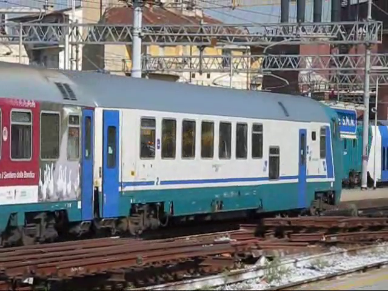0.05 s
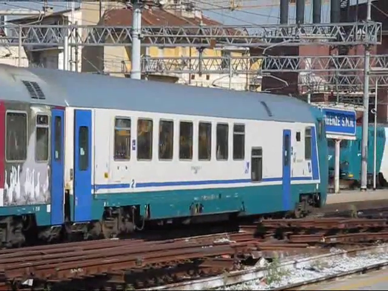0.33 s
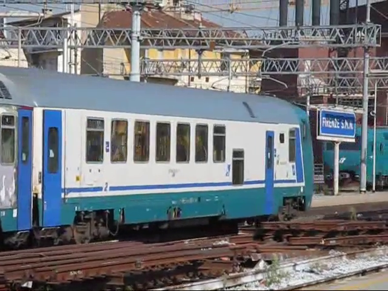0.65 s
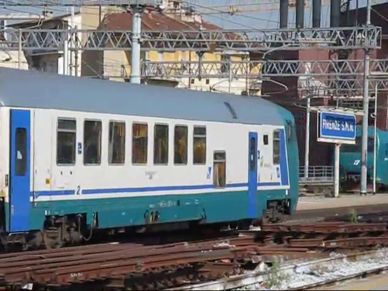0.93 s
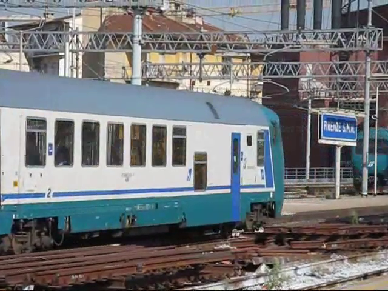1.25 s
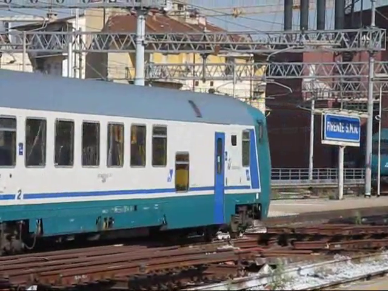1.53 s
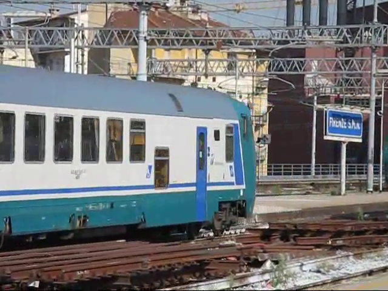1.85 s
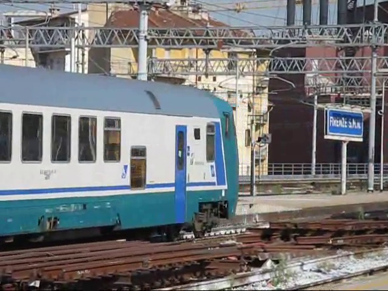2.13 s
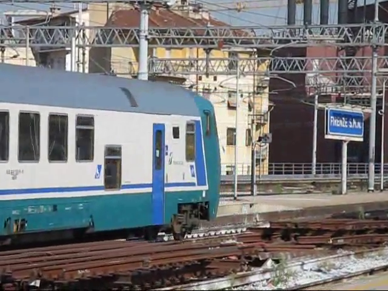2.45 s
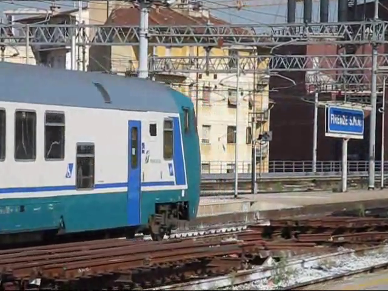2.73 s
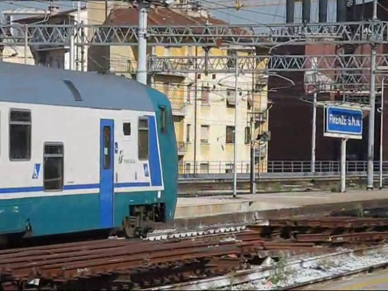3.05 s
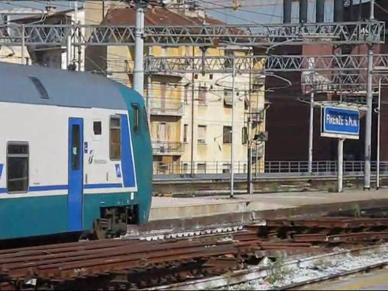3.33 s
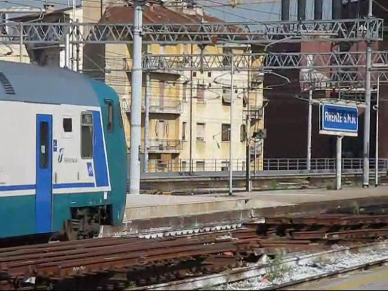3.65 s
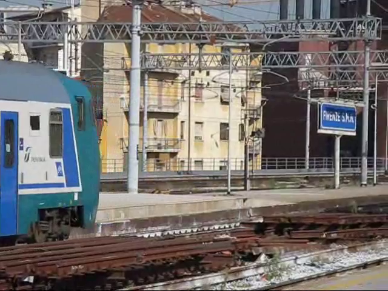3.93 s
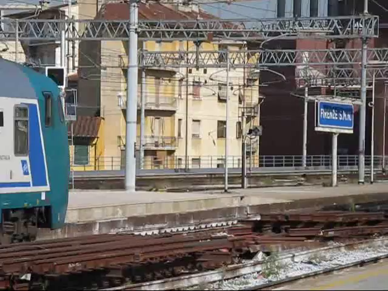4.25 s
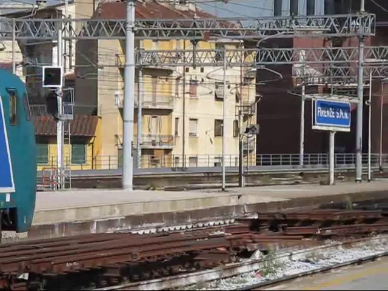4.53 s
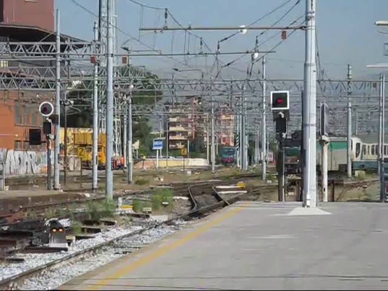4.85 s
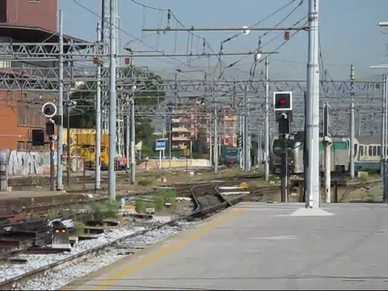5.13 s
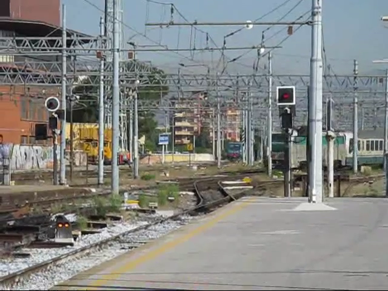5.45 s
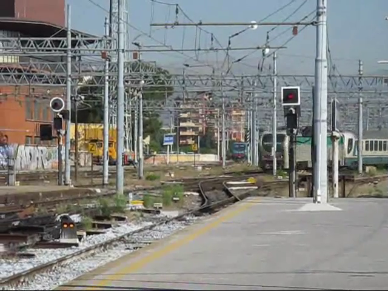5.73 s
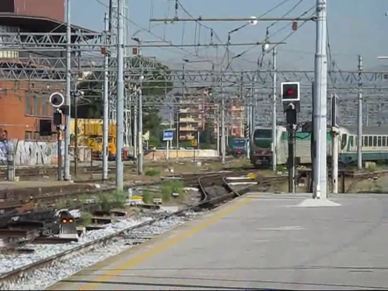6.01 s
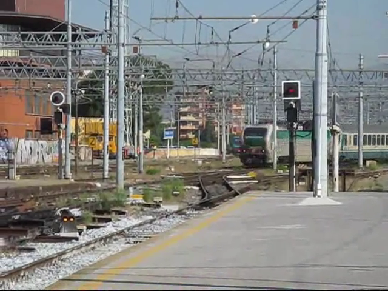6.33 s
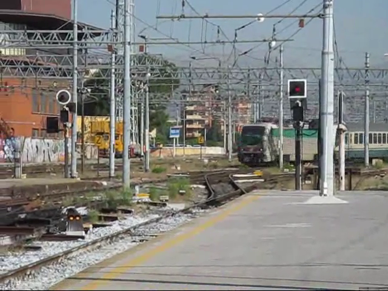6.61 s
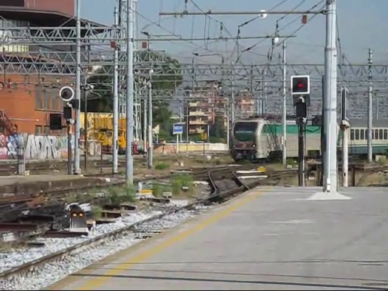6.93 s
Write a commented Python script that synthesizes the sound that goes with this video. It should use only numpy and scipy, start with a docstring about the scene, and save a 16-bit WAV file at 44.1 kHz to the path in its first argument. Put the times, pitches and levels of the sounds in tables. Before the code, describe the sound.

At the start a train wheel gives a few quick, high shrieks that echo through the station and fade within about a second. Passenger coaches roll slowly over points, steel wheels roaring and booming under a steady blower drone with a faint motor whine. Flanges scrape in short patches and running gear knocks irregularly, most clearly around 0.3 and 2.2 seconds. The booming swells near 4 seconds, then everything cuts off at 4.7.

After an instant of silence, at 4.8 seconds, compressed air hisses with a faint whistle over the broad roar of the rail yard. An approaching train rumbles low, with one distant wheel clunk at 6 seconds. A locomotive's wavering electric hum swells at about 6.3 and 7 seconds. Near 6.9 the air valve shuts, leaving a softer leak, and the rumble grows until the end, just after 7. The treble is gritty throughout.

```python
"""A wheel squeal dies away as passenger coaches roll slowly over station points: steel wheels roar
and boom, flanges scrape, running gear knocks, a blower drones. After a moment of silence, a second
scene down the platform: compressed air hisses until its valve shuts, a locomotive hums and an
approaching train rumbles through the yard's roar. A low sampling rate makes the treble gritty."""
import sys
import numpy as np
from scipy import signal
from scipy.fft import rfft, irfft, next_fast_len
from scipy.io import wavfile

SR = 44100
rng = np.random.default_rng(int(sys.argv[2]) if len(sys.argv) > 2 else 0)


def digitize_waveform(pressure):
    """Quantize a signal to 16-bit integers and store it at the path in sys.argv[1].

    Rows of a 2-D input are taken as channels; values are limited to [-1, 1].
    """
    field = np.atleast_2d(pressure).T
    bounded = np.clip(field, -1, 1)
    quanta = np.round(bounded * 32767).astype(np.int16)
    wavfile.write(sys.argv[1], SR, quanta)


N = 312228
TIME_S = np.arange(N) / SR
FREQ_HZ = np.arange(N // 2 + 1) * SR / N
HOLD_SAMPLES = 4

# yard and approaching train: time_s, roar_db, rumble_db
PLATFORM_LEVELS = [(4.82, -27, -38), (5.3, -26, -32.5), (5.7, -29, -36), (6.25, -25.5, -37),
                   (6.85, -26.5, -33), (6.97, -26.5, -27), (7.08, -24, -25)]


def undb(db):
    """Decibels to gain."""
    return 10 ** (np.asarray(db) / 20)


def unit_rms(x):
    """Scale to rms 1."""
    return x / np.sqrt(np.mean(x ** 2))


def curves(table):
    """Per-sample curve of each column after time_s."""
    time_s, *columns = np.transpose(table)
    return [np.interp(TIME_S, time_s, column) for column in columns]


def burst(centre_s, length_s):
    """Flat-topped swell of height 1."""
    return np.exp(-(2 * (TIME_S - centre_s) / length_s) ** 4)


def bursts(table):
    """Envelope from rows of centre_s, length_s, level_db."""
    return sum(undb(db) * burst(centre_s, length_s) for centre_s, length_s, db in table)


def drift(rate_hz, step_samples=32):
    """Smooth random curve of rms 1, band-limited near rate_hz."""
    size = next_fast_len(N // step_samples + 2)
    hz = np.fft.rfftfreq(size, step_samples / SR)
    slow = irfft(rfft(rng.standard_normal(size)) * np.exp(-(hz / rate_hz) ** 2), size)
    return np.interp(TIME_S, np.arange(size) * step_samples / SR, unit_rms(slow))


def contour(points):
    """Spectral gain through rows of freq_hz, gain_db."""
    hz, db = np.transpose(points)
    return undb(np.interp(np.log(FREQ_HZ + 1), np.log(hz), db))


def resonances(modes):
    """Spectral gain of steep peaks from rows of freq_hz, width_hz, gain_db."""
    peaks = (undb(db) / (1 + 2 * ((FREQ_HZ - hz) / width_hz) ** 2) for hz, width_hz, db in modes)
    return np.sqrt(sum(peak ** 2 for peak in peaks))


def band_limit(x, gain=1):
    """Apply a spectral gain; cut at half the low sampling rate."""
    return irfft(rfft(x) * gain * (FREQ_HZ < SR / HOLD_SAMPLES / 2), N)


def shaken(gain, flutter_db, rate_hz):
    """A body driven by a fluttering random force; rms 1."""
    force = rng.standard_normal(N) * undb(flutter_db * drift(rate_hz))
    return unit_rms(band_limit(force, gain))


def tone(hz, scatter, rate_hz):
    """Direct tone plus reflections that fade in and out; rms 1."""
    phase = 2 * np.pi * np.cumsum(hz + np.zeros(N)) / SR + 2 * np.pi * rng.random()
    in_phase = (1 + scatter * drift(rate_hz)) * np.cos(phase)
    quadrature = scatter * drift(rate_hz) * np.sin(phase)
    return unit_rms(in_phase + quadrature)


def yard(rings_db=-3):
    """Broad roar of the yard with narrow resonances."""
    # roar: freq_hz, gain_db
    spectrum = [(20, -35), (100, -8), (170, -4.5), (260, 4), (340, -7.5), (480, 4), (680, -1), (900, 1.5),
                (1300, -2.5), (1800, -5.5), (3000, -9), (5500, -24.5)]
    # resonances: freq_hz, width_hz, gain_db
    modes = [(193.4, 26, 0.5), (427, 5.1, 3), (570, 86, -4), (771, 38, -1.5), (1033, 25, -11),
             (1004, 5.3, 4), (1230, 22, -9)]
    roar_db, _ = curves(PLATFORM_LEVELS)
    roar = shaken(contour(spectrum), flutter_db=0.64, rate_hz=12)
    rings = undb(rings_db) * shaken(resonances(modes), flutter_db=1, rate_hz=2.3)
    return undb(roar_db) * (roar + rings)


def approaching_train():
    """A train rumbles closer; a far wheel drops into a rail gap."""
    # rumble: freq_hz, gain_db
    spectrum = [(20, -42), (32, -17), (40, -4), (47, -8), (53, 11), (65, 0), (80, -9), (100, 1), (120, -3),
                (150, -2), (230, -3), (340, -8), (500, -50)]
    # wheel drop: centre_s, length_s, level_db
    clunks = [(5.99, 0.048, -24)]
    _, rumble_db = curves(PLATFORM_LEVELS)
    rumble = undb(rumble_db) * shaken(contour(spectrum), flutter_db=1, rate_hz=8)
    clunk = bursts(clunks) * shaken(resonances([(564, 120, 0)]), flutter_db=6, rate_hz=55)
    return rumble + clunk


def locomotive(pitch_hz=261.15, hum_db=-34.8, octave_db=-38, rise_s=0.081, fall_s=0.29):
    """Distant, wavering electric hum; its octave swells as the locomotive comes into the open."""
    # octave swells: peak_s, level_db
    swells = [(6.32, -27.5), (6.98, -27)]
    swell = sum(undb(db) * np.exp(np.minimum((TIME_S - peak_s) / rise_s, (peak_s - TIME_S) / fall_s))
                for peak_s, db in swells)
    hum_hz = pitch_hz + 0.63 * drift(4.43)
    hum = undb(hum_db) * tone(hum_hz, scatter=0.84, rate_hz=8.4)
    octave = (undb(octave_db) + swell) * tone(2 * hum_hz, scatter=0.32, rate_hz=21)
    return hum + octave


def compressed_air(open_db=-24, leak_db=-30.5, shut_s=6.87, closing_s=0.094, whistle_db=-7):
    """An air jet hisses and faintly whistles; the valve shuts, leaving a leak."""
    # jet: freq_hz, gain_db
    spectrum = [(500, 5), (1200, 0.5), (1800, -2), (2300, -0.5), (3200, 2.5), (3900, 1.5), (4500, 0.5),
                (5000, -2), (5500, -5.5)]
    # whistling resonances: freq_hz, width_hz, gain_db
    modes = [(1977, 16, -1), (2265, 50, -6), (2342, 25, -1), (2422, 14, -5), (2672, 35, -3), (2972, 16, -3),
             (3070, 45, -6), (3612, 14, -4), (3900, 55, -1), (4162, 12, -1), (4290, 30, -6)]
    closed = np.clip((TIME_S - shut_s) / closing_s, 0, 1)
    jet = shaken(contour(spectrum), flutter_db=0.3, rate_hz=24)
    whistle = undb(whistle_db) * shaken(resonances(modes), flutter_db=0.3, rate_hz=12)
    return undb(open_db + closed * (leak_db - open_db)) * (jet + whistle)


def blower(blade_hz=353.15, blade_db=-18, motor_hz=58.66, beat_hz=0.95, beat_db=1, beat_peak_s=0.45):
    """A blade tone, beating against the next coach's blower, over the motor's shaft harmonics."""
    # shaft tone: time_s, level_db
    shaft_levels = [(0, -41), (.6, -52), (1.2, -39), (3.0, -40), (3.6, -51), (4.66, -40.5)]
    # motor tones: shaft_multiple, level_db
    harmonics = [(2, -48), (10, -30.5), (13, -41), (14, -44), (17, -46), (20, -37.5), (24, -44),
                 (30, -44.5)]
    # brief dips of the blade tone: centre_s, length_s, depth_db
    dips = [(0.656, 0.053, 11), (1.08, 0.034, 3), (1.526, 0.072, 13.5), (2.926, 0.22, 2.5),
            (3.876, 0.081, 8), (3.997, .13, 4.5), (4.193, 0.042, 9.5)]
    beating_db = beat_db * np.cos(2 * np.pi * beat_hz * (TIME_S - beat_peak_s))
    dip_db = sum(db * burst(centre_s, length_s) for centre_s, length_s, db in dips)
    drone_db = blade_db + beating_db - dip_db + 0.5 * drift(23)
    blade = undb(drone_db) * tone(blade_hz + 0.38 * drift(3), scatter=0.083, rate_hz=23)
    shaft_db, = curves(shaft_levels)
    shaft_hz = motor_hz + 0.06 * drift(2.55)
    shaft = undb(shaft_db) * tone(shaft_hz, scatter=0.3, rate_hz=5.1)
    whine = sum(undb(db) * tone(k * shaft_hz, scatter=0.02 * k, rate_hz=31) for k, db in harmonics)
    return blade + shaft + whine


def rolling(plain_rail_db=-26.5):
    """Rough steel on steel: track booms, contacts roar; on the points the roar swells, flanges scrape."""
    # wheel and track resonances: freq_hz, width_hz, gain_db
    boom_modes = [(207.3, 33, -13.5), (273, 25, -13), (285.8, 24.7, 0), (340, 64, -7.5), (412, 31, -14.5),
                  (527, 63, -10)]
    # boom: time_s, level_db
    boom_levels = [(0, -24), (.7, -21.5), (1.3, -20.5), (1.7, -23), (2.9, -23), (3.3, -25.5), (3.95, -19),
                   (4.66, -23)]
    # contact roar: freq_hz, gain_db
    roar_spectrum = [(20, -33), (45, -9), (140, -9), (230, -8.5), (460, -31.5), (630, -1.5), (1150, -4.5),
                     (1400, -8.5), (1780, -9), (2000, -13.5), (2450, -13.5), (3400, -17.5), (4400, -21.5),
                     (5500, -26)]
    # wheels taking the points: centre_s, length_s, roar_rise_db, scrape_db
    crossings = [(0.293, 0.14, 1.2, -46), (0.627, 0.28, 2, -41), (.83, 0.12, 2.1, -44),
                 (1.146, 0.09, 0.7, -31), (1.648, 0.16, 2, -38), (1.87, 0.12, 3, -32.5),
                 (2.245, 0.1, 0.4, -33), (2.495, .04, 1.4, -38), (2.907, .22, 1.5, -29.5),
                 (3.82, 0.26, 1.7, -37), (4.015, 0.097, 2, -37.5), (4.246, 0.071, 2.5, -44),
                 (4.38, .07, 2, -34)]
    flange_modes = [(894, 310, 5), (1650, 360, -17), (2800, 1700, -13)]  # freq_hz, width_hz, gain_db
    boom_db, = curves(boom_levels)
    rise_db = sum(db * burst(centre_s, length_s) for centre_s, length_s, db, _ in crossings)
    flange_contact = bursts([(centre_s, length_s, db) for centre_s, length_s, _, db in crossings])
    boom = undb(boom_db) * shaken(resonances(boom_modes), flutter_db=0.3, rate_hz=14)
    roar = undb(plain_rail_db + rise_db) * shaken(contour(roar_spectrum), flutter_db=0.52, rate_hz=33)
    scrape = flange_contact * shaken(resonances(flange_modes), flutter_db=1.5, rate_hz=120)
    return boom + roar + scrape


def gear_knocks(crack_decay_s=0.003, crack_db=4):
    """Loose running gear knocks on the points: a brief crack, then short steel rings."""
    # knocks: start_s, strength_db
    hits = [(0.25, -33), (1.157, -38.5), (1.897, -39), (2.196, -31), (2.505, -39), (2.771, -38.5),
            (3.116, -35), (3.291, -37), (3.640, -34)]
    # running gear: freq_hz, t60_s, gain_db
    modes = [(706, 0.067, 8), (990, 0.19, -8), (1474, 0.043, 9.5), (1740, 0.039, -4), (2310, 0.051, 1),
             (2830, 0.069, -0.5), (3770, 0.025, -15)]
    t = TIME_S[:SR // 5]
    knocks = np.zeros(N)
    for start_s, strength_db in hits:
        ring = sum(undb(db - 60 * t / t60_s) * rng.standard_normal() * np.sin(2 * np.pi * hz * t)
                   for hz, t60_s, db in modes)
        crack = undb(crack_db) * np.exp(-t / crack_decay_s) * rng.standard_normal(len(t))
        knocks[int(start_s * SR):][:len(t)] += undb(strength_db) * (ring + crack)
    return band_limit(knocks)


def wheel_squeal(pitch_hz=3438, tail_decay_s=0.28, tail_db=-6):
    """A wheel sticks and slips in short shrieks; the station reverberates."""
    # stick-slip bursts: centre_s, length_s, level_db
    shrieks = [(.005, 0.012, -30), (.032, 0.028, -25), (.068, .022, -34), (.1, 0.023, -28.5),
               (.134, 0.03, -33.5), (.208, .03, -41), (.382, .025, -40)]
    direct = bursts(shrieks) * tone(pitch_hz + 11 * drift(30), scatter=0.11, rate_hz=150)
    station = rng.standard_normal(SR) * np.exp(-TIME_S[:SR] / tail_decay_s)
    tail = signal.fftconvolve(direct, station / np.linalg.norm(station))[:N]
    return direct + undb(tail_db) * tail


def scene(coaches_end_s=4.6835, platform_start_s=4.823):
    """Passing coaches, a short silence, then the platform."""
    coaches = blower() + rolling() + gear_knocks() + wheel_squeal()
    platform = compressed_air() + yard() + approaching_train() + locomotive()
    return (coaches * (TIME_S < coaches_end_s) + platform * (TIME_S > platform_start_s))[None]


def record(dry, ceiling=0.47, cutoff_hz=15480):
    """A small camera rounds the peaks; its sample-and-hold mirrors the sound into gritty treble."""
    rounded = dry[0] / (1 + (dry[0] / ceiling) ** 6) ** (1 / 6)
    held = np.repeat(rounded[::HOLD_SAMPLES], HOLD_SAMPLES)[:N]
    low_pass = signal.ellip(12, 0.1, 80, cutoff_hz, fs=SR, output="sos")
    return signal.sosfilt(low_pass, held)[None]


dry = scene()
out = record(dry)
digitize_waveform(out)
```